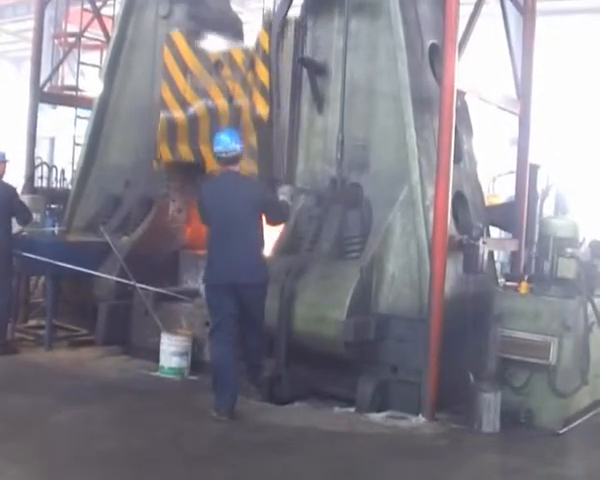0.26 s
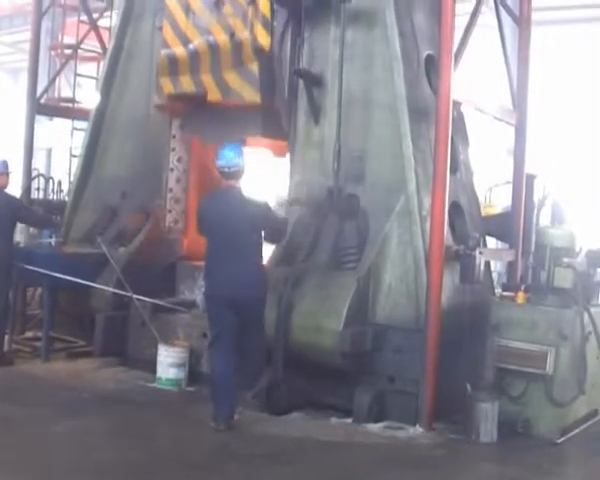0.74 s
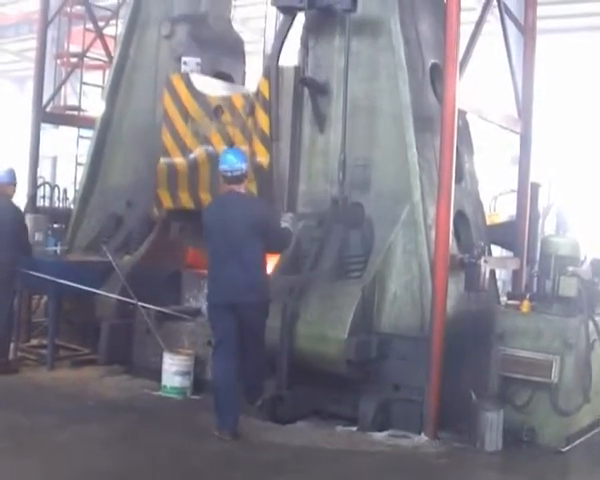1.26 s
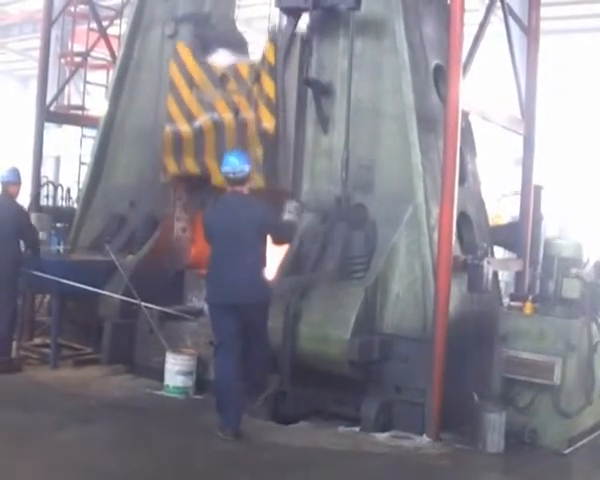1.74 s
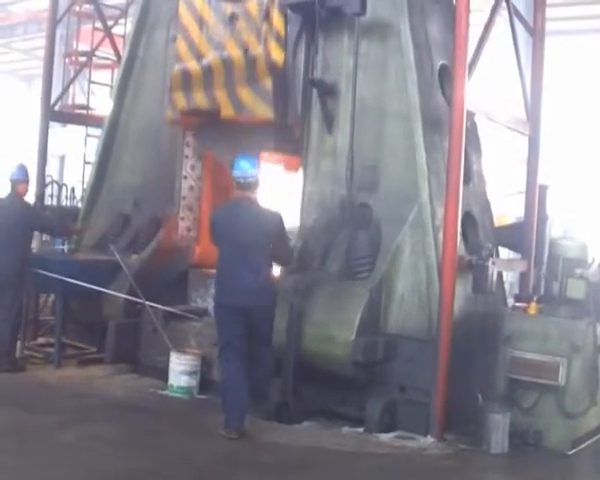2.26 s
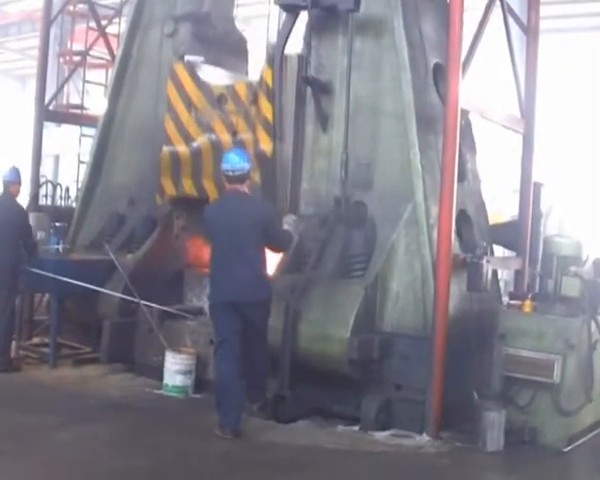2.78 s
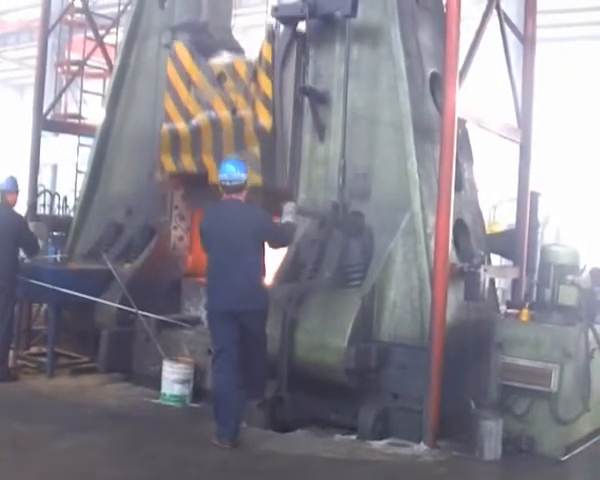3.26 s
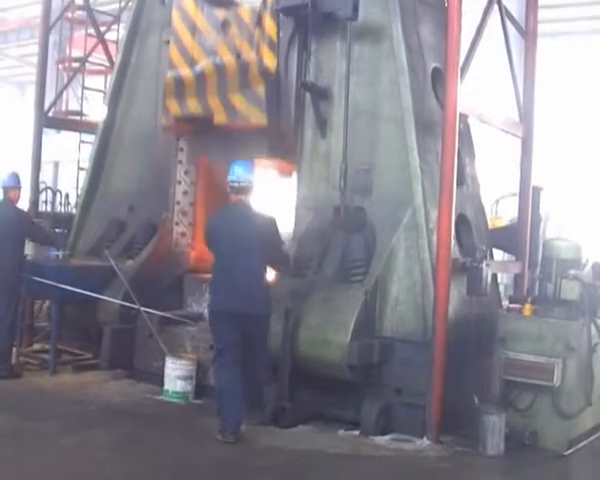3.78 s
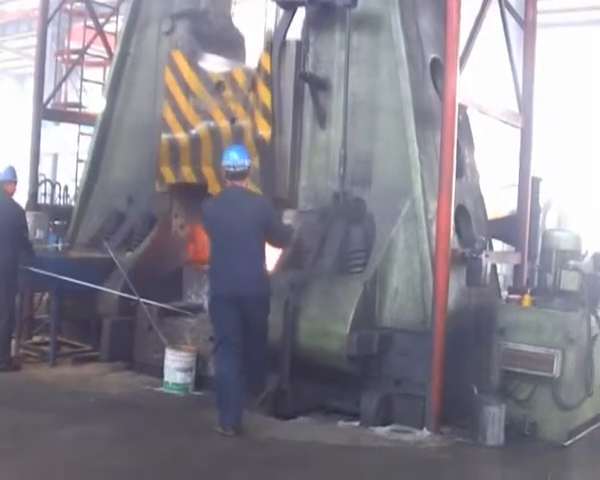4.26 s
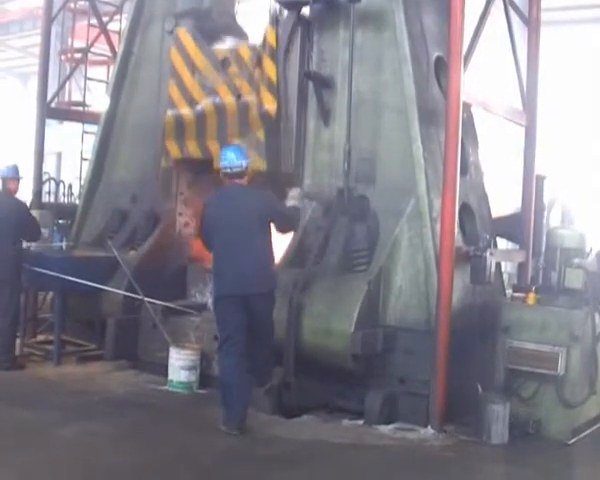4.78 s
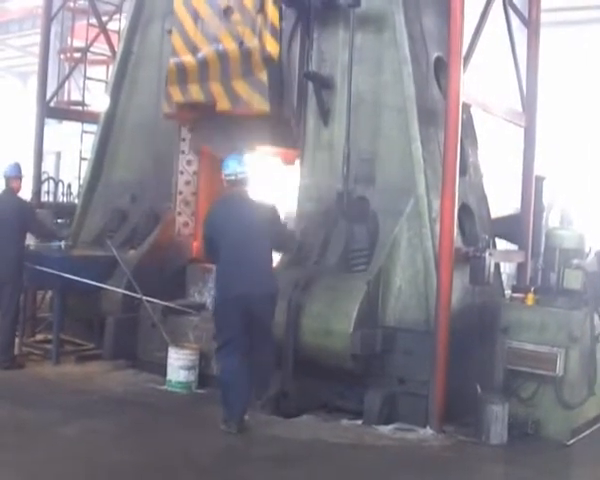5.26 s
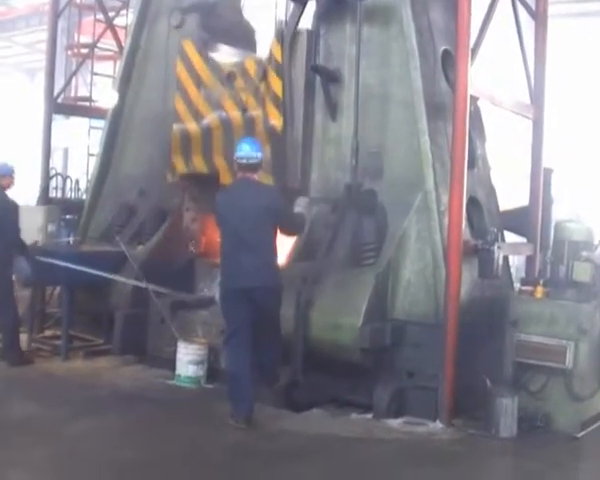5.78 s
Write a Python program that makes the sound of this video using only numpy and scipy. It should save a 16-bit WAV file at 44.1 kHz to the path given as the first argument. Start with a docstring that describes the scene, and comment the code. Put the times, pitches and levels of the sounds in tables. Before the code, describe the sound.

A large, hard-walled forging hall with a steady rush of blowers and motors, plus a wavering hum that flares unevenly around one kilohertz. At 0 s the crash and roar of an earlier blow are still dying away. At about 1.1 s valve gear clacks brightly, slightly left, with a rough spit of air; at 1.35 s the hammer lands with a blunt, overloaded crack and wide metallic crash. The massive frame rings, loose steel chatters, air hisses, and echoes roll back from roof and walls over the long, dense roar. The same sequence repeats: clacks at 2.55, 4.05 and 5.55 s, blows near 2.8, 4.3 and 5.8 s, the last two strongest. Each impact clips the microphone with a low thump, ducks the level, then the background creeps back. The final blow is still roaring at the end, around 6 s.

```python
"""Large steel-roofed hall: a forging hammer strikes a hot billet about every second and a half.
Its control valve clacks and lets air in, the dies crack, the frame rings: noise bursts and decaying sines.
Spent air hisses, loose parts clatter and the hall roars on, as shaped noise; machines hum and rush throughout.
Each blow overloads the recorder, whose gain control ducks and slowly recovers."""
import sys
import numpy as np
from scipy import signal
from scipy.fft import rfft, irfft
from scipy.io import wavfile
from scipy.ndimage import minimum_filter1d

SR = 44100
rng = np.random.default_rng(int(sys.argv[2]) if len(sys.argv) > 2 else 0)


def log_audio(samples):
    """Write samples as a 16-bit WAV file to the path given in sys.argv[1]."""
    # one column per channel
    frames = np.atleast_2d(samples).T
    # limit to full scale, then quantise
    limited = np.clip(frames, -1, 1)
    pcm = np.round(limited * 32767).astype(np.int16)
    wavfile.write(sys.argv[1], SR, pcm)


N = 265482
TIME = np.arange(N) / SR
FREQS = np.maximum(np.arange(N // 2 + 1) * SR / N, 1)

# ram blows, the first still echoing at the start:
# start_s, force_db, crack_db, crack_tilt_db_per_octave, low_ring_db
HAMMER_BLOWS = [(-.15, -3, 0, 0, -7), (1.344, -2.5, 4, 0, -0.5), (2.7864, -2, 3.5, -0.8, -1),
                (4.2883, -0.5, 7.5, 0, 0.5), (5.8136, -0.1, 2.5, 1.2, 2)]
BLOW_S, FORCE_DB, _, _, LOW_RING_DB = np.transpose(HAMMER_BLOWS)


def from_db(db):
    """Decibels to gain."""
    return 10 ** (np.asarray(db) / 20)


def rms_one(x):
    """Scale to unit power."""
    return x / np.sqrt(np.mean(x ** 2) + 1e-20)


def over_hz(points):
    """Join (Hz, value) points on a log-frequency axis."""
    hz, value = np.transpose(points)
    return np.interp(np.log(FREQS), np.log(hz), value)


def drift(rate_hz):
    """Slow random signal of rms 1: white noise through two equal low-pass poles."""
    hop = 100   # samples per slow step
    pole = np.exp(-2 * np.pi * rate_hz * hop / SR)
    white = rng.standard_normal(N // hop + 1002)
    slow = signal.lfilter([1], [1, -2 * pole, pole * pole], white)[1000:]   # filter settled
    return np.interp(np.arange(N) / hop, np.arange(len(slow)), rms_one(slow))


def noise(spectrum, spread_db=0.6, ripple_db=0):
    """Coloured stereo noise of rms 1 at two close microphones; ripple stands for crowds of close steel modes."""
    # microphone pair, before spread and a 0 dB cap: hz, side_minus_mid_db
    width = [(60, -7), (110, -9), (200, -16), (370, -15), (670, -14.5), (1230, -15), (2250, -13),
             (4130, -11.5), (7550, -13), (13800, 36.5)]
    # microphone pair: hz, left_minus_right_db
    lean = [(60, -4), (110, 2), (200, 2), (370, 0.7), (670, 0), (1230, 0.5), (2250, 0.76), (4130, 1.8),
            (7550, 2.5), (13800, -2.5)]
    mid, side = rfft(rng.standard_normal((2, N)))
    sign = np.array([[1], [-1]])   # left, right
    side_gain = from_db(np.minimum(over_hz(width) + spread_db, 0))
    pair = (mid + sign * side * side_gain) * from_db(sign * over_hz(lean) / 2)
    modes_hz = np.arange(0, SR / 2, 14)
    ripple = np.interp(FREQS, modes_hz, rng.uniform(-1, 1, len(modes_hz)))
    ripple = ripple * np.minimum(FREQS / 1000, 1) ** 2   # fades out below 1 kHz
    return rms_one(irfft(pair * from_db(over_hz(spectrum) + ripple_db * ripple), N))


def bursts(starts_s, levels_db, rise_s, t60_s):
    """Envelope of events that swell quickly and die away; their powers add."""
    power = np.zeros(N)
    for start_s, db in zip(starts_s, levels_db):
        first = max(int(start_s * SR) + 1, 0)
        age_s = TIME[first:] - start_s
        swell = from_db(db) * np.minimum(age_s / rise_s, 1)
        power[first:] += swell ** 2 * np.exp(-2 * np.log(1000) * age_s / t60_s)
    return np.sqrt(power)


def in_hall(starts_s, levels_db, spectrum, rise_s, ripple_db):
    """Diffuse sound of short events, decaying band by band: the air swallows the treble first."""
    # decay of the hall: hz, t60_s
    hall_decay = [(60, 1.85), (200, 2.6), (550, 2.1), (1100, 2.43), (2500, 2.36), (4500, 1.86),
                  (7000, 1.067), (9500, 0.51), (13000, 0.52)]
    centres_hz, t60s_s = np.transpose(hall_decay)
    field, out = rfft(noise(spectrum, ripple_db=ripple_db)), 0
    for share, t60_s in zip(np.eye(len(centres_hz)), t60s_s):
        band = irfft(field * over_hz(np.transpose([centres_hz, share])), N)
        out = out + band * bursts(starts_s, levels_db, rise_s, t60_s)
    return out


def tone(hz, scatter, rate_hz):
    """A sine of rms 1 whose level and phase waver as its many reflections mix."""
    wobble = 1 + scatter * (drift(rate_hz) + 1j * drift(rate_hz))
    return rms_one(np.real(wobble * np.exp(2j * np.pi * (hz * TIME + rng.random()))))


def factory():
    """Rush and wavering hum of motors and blowers; a narrow band near 1 kHz flares unevenly."""
    # machine rush: hz, relative_db_per_hz
    rush_spectrum = [(50, -21), (100, -23), (180, -11), (340, -7), (460, -10), (630, -11), (770, -10.5),
                     (890, -2), (1020, -3), (1250, -1.5), (2000, -6), (3000, -14.5), (4600, -26),
                     (7500, -30), (9500, -60), (11000, -95)]
    # hum lines, each swelling and fading on its own, keyed by hz: time_s, level_db_rms
    hum_lines = {348.5: [(0, -43), (.7, -42.5), (1.2, -34), (1.8, -46), (2.55, -39.5), (3, -41), (3.3, -33),
                 (3.65, -47), (3.92, -45), (4.1, -32), (4.7, -43), (5.4, -37), (6, -38.5)],
                 523: [(0, -47.5), (6, -45.5)], 694.5: [(0, -50), (1.1, -44.5), (2.5, -57), (3.5, -50),
                 (3.9, -41), (4.8, -49), (5.3, -41), (6, -46)], 1006: [(0, -17), (.3, -32), (.55, -25),
                 (.8, -36), (1.02, -27), (1.25, -38), (2, -34.5), (2.35, -34), (2.6, -34.5), (2.95, -25),
                 (3.4, -31), (3.85, -37), (4.15, -40), (4.6, -22), (5.1, -37), (5.45, -28.5), (5.7, -41),
                 (6, -30)]}
    rush = from_db(-22.0) * noise(rush_spectrum, ripple_db=2.0) * from_db(0.41 * drift(18.0))
    hum = 0
    for hz, levels in hum_lines.items():
        level_db = np.interp(TIME, *np.transpose(levels))
        hum = hum + from_db(level_db) * tone(hz, scatter=0.12 + hz / 4000, rate_hz=2.25)
    flare_db = -33 + 2.2 * drift(3.4)
    flares = from_db(flare_db) * tone(990, scatter=4, rate_hz=80)
    return rush + hum + flares


def crash():
    """Wide crash of each blow: noise that swells quickly and dies within about half a second."""
    # crash: hz, relative_db_per_hz
    crash_spectrum = [(80, -14.5), (260, -4.5), (470, 1), (720, -0.5), (900, 8.5), (1500, 1), (3200, 1),
                      (4600, -6), (7000, -3.5), (10000, -31), (13000, -61.5)]
    envelope = bursts(BLOW_S, FORCE_DB + 3, rise_s=0.024, t60_s=0.53)
    return noise(crash_spectrum, spread_db=11.5, ripple_db=7.5) * envelope


def hall_roar():
    """The hall's diffuse reverberation of each blow, its level flickering."""
    # roar: hz, relative_db_per_hz
    roar_spectrum = [(50, -25.5), (90, -8), (170, -11), (300, -4), (470, -8.5), (720, -6), (930, 1.5),
                     (1400, -2.5), (2200, -5.5), (3200, -10), (4600, -15), (8000, -32), (13000, -41)]
    roar = in_hall(BLOW_S, FORCE_DB + 0.88, roar_spectrum, rise_s=0.039, ripple_db=3.0)
    return roar * from_db(0.5 * drift(31))


def exhaust():
    """Spent air hisses out at each blow and decays in the hall."""
    # exhaust: hz, relative_db_per_hz
    exhaust_spectrum = [(1500, -35), (3000, -12.5), (4500, -8), (6900, 0), (8500, -0.5), (10000, -8),
                        (14000, -28)]
    return in_hall(BLOW_S, FORCE_DB - 2.5, exhaust_spectrum, rise_s=0.023, ripple_db=0.0)


def far_echoes():
    """Each blow rolls back from the roof and the far wall as swelling noise."""
    # echoes: delay_s after the blow, level_db re force, swell_s, t60_s
    returns = [(.08, -5.5, 0.031, 0.51), (.53, -19, .08, 0.65)]
    # echoes: hz, relative_db_per_hz
    echo_spectrum = [(150, -20), (400, -3.5), (650, 3), (820, 3.5), (1150, -1), (1550, 3), (2500, -4),
                     (4500, -7.5), (6500, -7.5), (10000, -57)]
    out = 0
    for delay_s, db, swell_s, t60_s in returns:
        envelope = bursts(BLOW_S + delay_s, FORCE_DB + db, rise_s=swell_s, t60_s=t60_s)
        out = out + noise(echo_spectrum, spread_db=3.5, ripple_db=5) * envelope
    return out


def frame_ring():
    """Modes of frame and ram ring; higher ones come in closer clusters and beat faster."""
    # modes: hz, level_db re force, t60_s, swell_s
    frame_modes = [(118, -32, 2.2, 0.2), (167, -33, 3.3, 0.076), (243, -21, 1.96, 0.057),
                   (318.8, -11.5, 1.5, 0.15), (389.7, -16, 2.06, 0.07), (626, -15.5, 1.1, 0.11),
                   (823, -13.5, 1.64, 0.041), (891, -15.5, 2, .08), (1020, -17.5, 2.7, 0.092),
                   (1092, -16.5, 2.3, 0.099), (1130, -19, 3.14, 0.17), (1293, -19.5, 2, 0.061),
                   (1592, -17.5, 2.2, 0.079), (1843, -30, 2.0, 0.09), (2000, -24, 2.4, 0.096),
                   (4030, -33.5, 2.5, .08), (7005, -34, 0.99, .08), (7540, -30, .9, .08)]
    low_ring_limit_hz = 500
    ring = 0
    for hz, db, t60_s, swell_s in frame_modes:
        strength_db = FORCE_DB + db + LOW_RING_DB * (hz < low_ring_limit_hz)
        strength_db = strength_db + rng.standard_normal(len(BLOW_S))   # no two blows land alike
        beating = tone(hz, scatter=0.15 + hz / 1500, rate_hz=3 + hz / 300)
        ring = ring + beating * bursts(BLOW_S, strength_db, rise_s=swell_s, t60_s=t60_s)
    return ring * from_db([[.3], [-.3]])   # left, right


def clatter():
    """Loose steel parts on the frame chatter brightly and roughly for a moment after each blow."""
    # clatter: hz, relative_db_per_hz
    clatter_spectrum = [(1000, -19.5), (2200, 3), (4000, -0.5), (5200, -2), (6500, -1.5), (8000, -11),
                        (10000, -53)]
    chatter = rms_one(from_db(5 * drift(120)))   # fast flutter
    envelope = bursts(BLOW_S, FORCE_DB - 10, rise_s=0.064, t60_s=0.85)
    return noise(clatter_spectrum, ripple_db=5) * chatter * envelope


def inlet_air(lead_s, length_s, level_db):
    """Air hisses softly into the cylinder: noise swelling and fading in a bell around each blow."""
    flow = sum(np.exp(-((TIME - blow_s + lead_s) / length_s) ** 2) for blow_s in BLOW_S)
    hiss = noise([(3000, -25.5), (5500, -20.5), (8200, 14.5), (9700, -1.5), (11000, -50.0)])
    return from_db(level_db) * flow * hiss


def valve_gear():
    """Valve air spits roughly; steel parts knock in fixed order, each a short bright ring with a hall wash."""
    # openings ahead of the blows: start_s, level_db
    openings = [(1.0976, -25), (2.542, -27.5), (4.0413, -26.5), (5.571, -26.5)]
    # clacks of the gear: delay_s after opening, level_db re opening, ring_hz, ring_width_hz
    clack_steps = [(0, 1, 6450, 1200), (.0195, 2.5, 5400, 4800), (.082, -4, 5300, 3000),
                   (.101, -8, 5500, 3500), (.16, -9, 5500, 3500), (.168, -9, 6500, 3000)]
    # air through the opening valve: hz, relative_db_per_hz
    spit_spectrum = [(1500, -16), (3000, 10), (4500, -2), (6900, 5), (8500, 3), (11000, -40)]
    # hall wash of the clacks: hz, relative_db_per_hz
    wash_spectrum = [(2000, -8), (3800, 7), (6600, 12), (8300, -11), (10000, -42.5), (11500, -51)]
    knock = noise([(1500, -4), (3300, 16), (8000, 9), (10000, -15), (12000, -40)])
    open_s, open_db = np.transpose(openings)
    clacks, starts_s, levels_db = 0, [], []
    for delay_s, db, hz, width_hz in clack_steps:
        clack_s, clack_db = open_s + delay_s, open_db + db
        b, a = signal.iirpeak(hz, hz / width_hz, fs=SR)
        ringing = rms_one(signal.lfilter(b, a, knock))
        clacks = clacks + ringing * bursts(clack_s, clack_db, rise_s=0.00073, t60_s=0.024)
        starts_s = np.append(starts_s, clack_s)
        levels_db = np.append(levels_db, clack_db)
    spit = noise(spit_spectrum) * bursts(open_s, open_db - 4, rise_s=0.006, t60_s=0.15)
    wash = from_db(-16.0) * in_hall(starts_s, levels_db, wash_spectrum, rise_s=0.009, ripple_db=9)
    sputter = from_db(1.8 * drift(70))
    return clacks * from_db([[1.5], [0]]) + (spit + wash) * sputter   # clacks lean left


def die_cracks(rise_s, t60_s):
    """Flat dies meet at once: brief noise from straight ahead, its spectrum evened, then coloured."""
    # crack, before each blow's tilt: hz, relative_db_per_hz
    crack_spectrum = [(50, -7), (150, -6.5), (600, -6.5), (1400, 0.5), (2600, -6), (4000, -11.5),
                      (7500, -15), (13000, -34)]
    out, size = np.zeros(N), 4096
    bins_hz = np.arange(size // 2 + 1) * SR / size
    octaves = np.log2(np.maximum(FREQS / 1000, 1))   # above 1 kHz
    shape = bursts([0], [0], rise_s, t60_s)[:size]
    for start_s, _, crack_db, tilt_db, _ in HAMMER_BLOWS[1:]:   # the first crack is over before the start
        first = int(start_s * SR)
        even = np.exp(1j * np.angle(rfft(shape * rng.standard_normal(size))))   # phase only
        colour_db = over_hz(crack_spectrum) + tilt_db * octaves
        colour = from_db(np.interp(bins_hz, FREQS, colour_db))
        crack = irfft(even * colour) * shape ** .25
        out[first:first + size] += from_db(crack_db) * rms_one(crack) * np.sqrt(np.mean(shape ** 2))
    return out


def scene():
    """Everything that sounds in the hall."""
    blows = crash() + hall_roar() + exhaust() + far_echoes() + frame_ring() + clatter()
    air = inlet_air(lead_s=0.013, length_s=0.33, level_db=-44.0)
    return factory() + blows + air + valve_gear() + die_cracks(rise_s=0.0034, t60_s=0.068)


def gain_control(x, limit_db, attack_db_per_s, release_db_per_s):
    """Turns peaks down towards the limit within milliseconds, then creeps back up."""
    peak = -minimum_filter1d(-np.abs(x).max(axis=0), size=64)
    excess_db = np.maximum(20 * np.log10(np.maximum(peak, 1e-9)) - limit_db, 0)
    recovery_db, attack_db = release_db_per_s * TIME, attack_db_per_s * TIME
    wanted_db = np.maximum.accumulate(excess_db + recovery_db) - recovery_db
    cut_db = np.minimum.accumulate(wanted_db - attack_db) + attack_db   # the gain can only fall so fast
    return x * from_db(-cut_db)


def record(dry, overload=2.014, bass_hz=130, lopsided=0.17):
    """Microphone saturates; blow fronts outrun the gain control and clip unevenly, with a low thump."""
    squashed = dry / (1 + (dry / overload) ** 4) ** (1 / 4)
    bass_cut = signal.butter(3, bass_hz, "high", fs=SR, output="sos")
    thinned = signal.sosfilt(bass_cut, squashed)
    ducked = gain_control(thinned, limit_db=-4.0, attack_db_per_s=1600, release_db_per_s=15.5)
    ceiling = .93 * (1 + lopsided * np.sign(ducked))   # higher for positive swings
    clipped = ducked / (1 + (ducked / ceiling) ** 8) ** (1 / 8)
    top_cut = signal.cheby2(14, 60, 14800, fs=SR, output="sos")   # 60 dB down from 14800 Hz
    return signal.sosfilt(top_cut, clipped)


dry = scene()
out = record(dry)
log_audio(out)
```